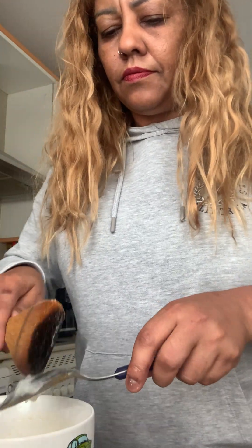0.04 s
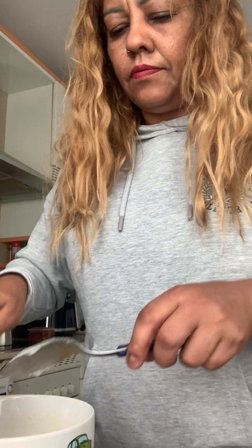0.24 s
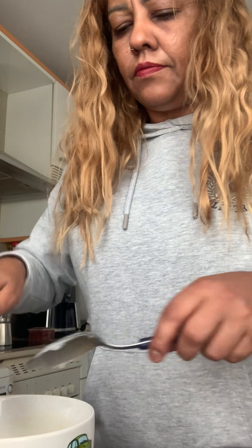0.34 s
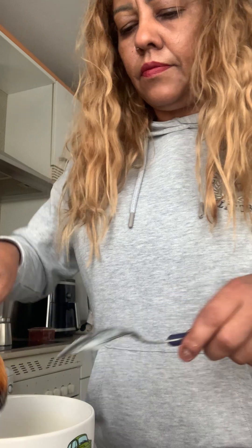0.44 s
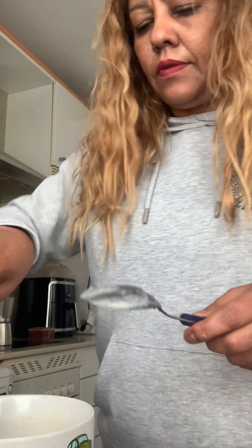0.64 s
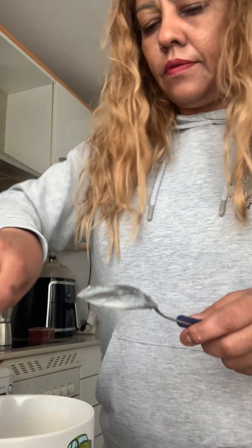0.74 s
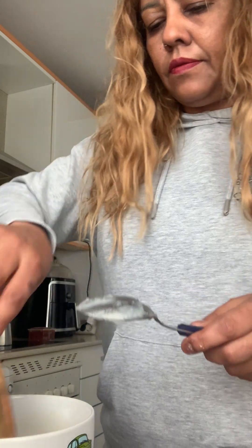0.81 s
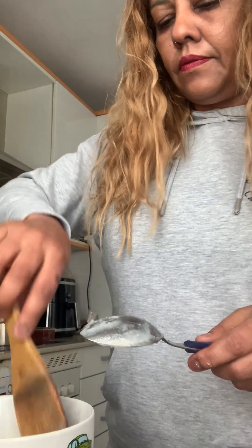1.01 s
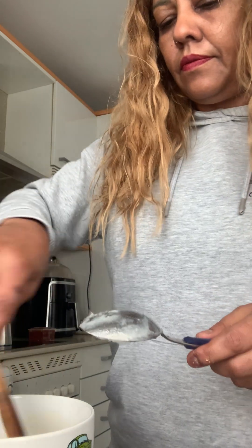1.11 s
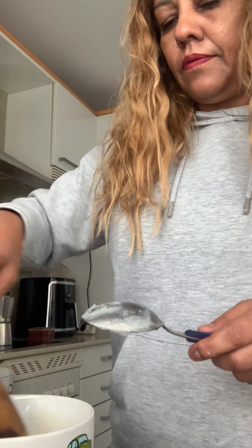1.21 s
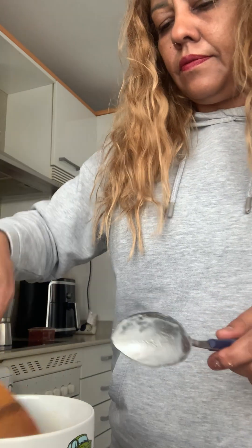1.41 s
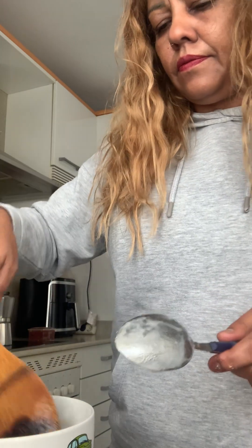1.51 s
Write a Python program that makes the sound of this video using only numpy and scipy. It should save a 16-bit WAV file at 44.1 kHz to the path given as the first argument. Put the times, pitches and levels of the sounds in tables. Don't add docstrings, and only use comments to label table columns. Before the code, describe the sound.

Close stereo phone pickup in a tiled kitchen: over a faint hum and a fading earlier clink, wood and metal hit a ceramic bowl hard, then lightly tick, scrape, thump and rattle.

```python
import sys
import numpy as np
from scipy import signal
from scipy.fft import rfft, irfft
from scipy.io import wavfile
from scipy.ndimage import uniform_filter1d, map_coordinates

SR = 44100
rng = np.random.default_rng(int(sys.argv[2]) if len(sys.argv) > 2 else 0)


def log_audio(samples):
    frames = np.atleast_2d(samples).T
    limited = np.clip(frames, -1, 1)
    pcm = np.round(limited * 32767).astype(np.int16)
    wavfile.write(sys.argv[1], SR, pcm)


def how_loud(loudness_db):
    steps = np.asarray(loudness_db, float) / 20
    return 10 ** steps


N = 68355

# frequency in Hz, density in dB per Hz.
HUM_SPECTRUM = [(25, -15.5), (50, 14.5), (100, -6), (200, -4), (500, -6.5), (1000, -17), (2200, -28.5),
                (5500, -38.5)]
# time in seconds, change of level in dB.
HUM_SWELL = [
    (0, 1.5),
    (.18, -16),
    (.45, 8),
    (.68, 3),
    (.95, 2.5),
    (1.55, 10.5),
]
# frequency in Hz, density in dB per Hz.
HISS_SPECTRUM = [(4000, -11.5), (6000, -6), (7600, -7), (8500, -2), (10300, -6), (11500, -13.5),
                 (12500, -41)]
# frequency in Hz, density in dB per Hz.
EARLIER_SPECTRUM = [(250, -36), (480, -5.5), (900, -12.5), (1690, -0.5), (2000, -6.5), (2750, 0.5),
                    (4000, -9.5), (6500, -24), (7200, -45.5)]
# band centre in Hz, t60 in seconds, level in dB, likeness of channels 0-1.
ROOM_BANDS = [(106, 0.41, -2.5, 1), (324, 0.39, -4.5, .5), (1000, 0.43, 0, 0.1), (2500, 0.49, -7, 0.1),
              (5770, 0.37, 1, 0.5), (10230, 0.25, -4, 1)]
# delay in ms, level in dB.
REFLECTIONS = [(.9, -33.5), (2.3, -24.5), (4.1, -18.5), (7.3, -21)]
# time in seconds, level in dB.
SCRAPE_LEVEL = [(0, -107), (0.171, -82), (0.2, -51), (0.238, -28), (0.401, -57.5), (0.551, -78), (.72, -71),
                (0.758, -45.5), (.9, -69.5), (0.998, -94), (1.038, -41), (1.198, -93), (1.25, -61),
                (1.287, -61.5), (1.36, -58), (1.418, -56.5), (1.55, -113)]
# frequency in Hz, level in dB, t60 in seconds.
COUNTER_MODES = [(97, -7, 0.2), (153.8, -11, 0.17), (184.3, -16.5, 0.28), (214.2, -7, 0.1),
                 (252, -8, 0.091), (290, -4.5, 0.095), (337, -13, 0.11), (418.5, -10.5, 0.15)]
# frequency in Hz, level in dB, t60 in seconds.
BOWL_MODES = [(356.4, -14.5, 0.18), (405, -18, .1), (562, -7.5, 0.052), (651.3, -13, 0.15),
              (742, -6, 0.045), (795, -11, 0.04), (940, -9.5, 0.032), (989.4, -20, 0.16),
              (1152, -8.5, 0.051), (1300, -8, 0.03), (1457.4, -11, 0.08), (1690, -12.5, 0.03),
              (1812, -8.5, 0.016), (2790, -7.5, 0.01)]
# start in seconds, bowl level in dB, counter level in dB, contact time in ms.
KNOCKS = [(0.2201, -13.5, -28.5, 0.43), (.2255, -15, -24, 0.14), (0.2308, -14, -24.5, 0.57),
          (.238, -20.5, -34, 0.8), (0.253, -20.5, -47.5, 0.23), (.523, -57.5, -50.5, 0.44),
          (0.747, -39, -36, 1.82), (0.77, -61, -48.5, 0.93), (0.794, -54, -42, 1.7), (.827, -37, -53, .9),
          (1.025, -40.5, -44.5, 0.57), (1.029, -36.5, -73, 0.74), (1.045, -29.5, -31.5, 1.05),
          (1.050, -41, -33, 2.06), (1.074, -37, -33.5, 2.37), (1.1, -32, -39.5, 2.1),
          (1.263, -29.5, -72, 0.28), (1.277, -32, -36.5, 1.12), (1.318, -31, -49.5, 0.71),
          (1.328, -32.5, -49.5, 0.81), (1.379, -33, -38.5, 0.75), (1.406, -43.5, -46, 0.44),
          (1.4171, -35, -47, 0.47), (1.426, -41, -49, 0.69), (1.447, -38.5, -56, 0.79),
          (1.457, -29.5, -60, 1.84), (1.476, -40, -48, 0.96), (1.533, -48, -46.5, 0.54)]
# frequency in Hz, level in dB, t60 in seconds.
NOTE_MODES = [(1278.1, 1.5, 0.12), (1287.7, -1.5, .125)]
# start in seconds, level in dB.
RIM_KNOCKS = [
    (0.221, -10),
    (1.264, -32.5),
]
# start in seconds, level in dB, pitch in Hz, t60 in ms.
THUMPS = [
    (.7535, -27, 151, 27),
    (.770, -31.5, 140, 24),
    (.794, -28.5, 200, 19),
    (1.0465, -22.5, 300, 37),
    (1.0555, -11.5, 182, 20),
    (1.0735, -23.5, 170, 23),
]
# start in seconds, level in
# dB, pitch in Hz, t60 in ms.
CLACKS = [(.193, -41, 1520, 24), (0.1967, -16.5, 1540, 22), (.198, -55, 14600, 9.2),
          (0.1964, -26.5, 1000, 40), (.1985, -38, 4600, 26), (.2219, -25.5, 1150, 7.2),
          (.2255, -14, 1200, 8.7), (0.2282, -22.5, 3150, 20), (0.2271, -21.5, 2550, 31),
          (.2305, -14, 1263, 14), (.2375, -12, 1300, 14), (0.25, -28, 1830, 60), (.521, -58, 2700, 19),
          (0.39, -60.5, 3500, 12), (0.5226, -40, 614, 22), (0.79, -45, 480.4, 20),
          (.741, -31.5, 1625, 25.6), (.7415, -35, 804, 26), (.828, -43, 920, 31), (.837, -38.5, 1000, 10.6),
          (.843, -43, 514, 73), (1.027, -32, 850, 20.3), (1.042, -66, 15300, 11), (1.2615, -54, 4260, 10),
          (1.262, -40.5, 3190, 21.4), (1.2632, -47, 2500, 25), (1.263, -33, 1300, 44),
          (1.265, -27, 868, 35.5), (1.319, -34, 1118, 21), (1.372, -40, 3070, 10.3),
          (1.3722, -27.5, 1690, 27), (1.373, -47, 4430, 9.7), (1.375, -30, 903, 23),
          (1.378, -53.5, 5340, 14), (1.382, -57, 5900, 13), (1.39, -60, 5000, 11), (1.418, -29, 1110, 15),
          (1.447, -27, 880, 15.3), (1.474, -40, 1000, 29)]
# frequency in Hz, level in dB, t60 in seconds.
SPOON_LOW = [(2539, 5.5, 0.021), (2590, -9, 0.024), (2415, -12, 0.022)]
SPOON_MID = [(3445, -1.5, 0.02), (3670, 0, 0.014), (3830, 7, 0.013), (4120, 1, 0.012), (4670, -19.5, 0.038)]
SPOON_TOP = [(5180, 8, 0.0063), (6013, 7.5, 0.0088), (6576, 6, 0.0065), (7880, -8, 0.0065),
             (8690, -1, 0.0068), (9600, -6.5, 0.0097), (10600, -16, .006), (15200, -26, .008)]
# frequency in Hz, density in dB per Hz.
CRACK_SPECTRUM = [(800, -2), (3000, -2), (7000, -20.5), (11000, -17), (12500, -24.5), (14500, -31.5),
                  (16000, -44.5)]
# start in seconds, then low, middle, treble and crack levels in dB.
TICKS = [
    (0.1987, -63, -25, -29.5, -41),
    (.741, -39, -33, -45.5, -48),
    (1.041, -34.5, -36.5, -49, -42.5),
    (1.263, -57, -57.5, -70, -58.5),
    (1.373, -56, -56.5, -71, -61.5),
    (1.548, -60, -86, -68.5, -62),
]

HUM_DB, HUM_ALIKE = -63, 0.7
HISS_DB, HISS_ALIKE = -83, 0.82
EARLIER_DB, EARLIER_T60_S = -43.5, 0.41
ROOM_DELAY_MS, ROOM_TOP_HZ = 1.3, 11500
EARLIER_ALIKE = 0.38
RIM_ROOM_DB, THUMP_ROOM_DB = -13, -13
SCRAPE_PER_S, GRAIN_DB = 900, 2.5
SCATTER_DB, DETUNE = 1.2, 0.003
RISE_MS, CRACK_MS = 0.26, 4.5
SLIDE_DB, SLIDE_MS = -30.5, 6
LEFT_LAG_SAMPLES = 5.01
LEFT_BASS_DB, LEFT_BASS_HZ = 4, 143.5
MIC_LOW_HZ = 80


def shaped(points, size):
    hz, db = np.array(points).T
    f = np.maximum(np.arange(size // 2 + 1) * SR / size, 1)
    gain = how_loud(np.interp(np.log(f), np.log(hz), db, left=-90, right=-90))
    x = irfft(rfft(rng.standard_normal(size)) * gain, size)
    return x / x.std()


def pair(make, alike):
    c = np.clip(alike, 0, 1)
    mid = make() * np.sqrt((1 + c) / 2)
    side = make() * np.sqrt((1 - c) / 2)
    return np.array([mid + side, mid - side])


def add(out, s, x):
    i = int(s * SR)
    out[i:i + len(x)] += x[:len(out) - i]


def decay(t, t60):
    return 1000. ** (-t / t60)


def ring(modes, db, size=20000):
    hz, mode_db, t60 = np.array(modes).T[:, :, None]
    chance = rng.standard_normal((2, len(modes), 1))
    t = np.arange(size) / SR
    waves = np.sin(2 * np.pi * hz * (1 + DETUNE * chance[0]) * t) * decay(t, t60)
    sign = (-1.) ** np.arange(len(modes))[:, None]
    level = how_loud(db + mode_db + SCATTER_DB * chance[1])
    return (sign * level * waves).sum(axis=0)


def background():
    swell_s, swell_db = np.array(HUM_SWELL).T
    hum_level = how_loud(HUM_DB + np.interp(np.arange(N) / SR, swell_s, swell_db))
    hum = hum_level * pair(lambda: shaped(HUM_SPECTRUM, N), HUM_ALIKE)
    hiss = how_loud(HISS_DB) * pair(lambda: shaped(HISS_SPECTRUM, N), HISS_ALIKE)
    return hum + hiss


def earlier_clink():
    noise = pair(lambda: shaped(EARLIER_SPECTRUM, N), EARLIER_ALIKE)
    return noise * how_loud(EARLIER_DB) * decay(np.arange(N) / SR, EARLIER_T60_S)


def room(x, size=32768):
    t, tail = np.arange(size) / SR, 0
    for hz, t60, db, alike in ROOM_BANDS:
        points = [(hz / 3, -30), (hz / 1.266, 0), (hz * 2.0, 0), (hz * 3, -30)]
        noise = pair(lambda: shaped(points, size), alike)
        shape = decay(t, abs(t60)) * (1 - np.exp(-t * 1000 / ROOM_DELAY_MS))
        shape = shape / np.sqrt(np.sum(shape ** 2))
        tail = tail + noise * shape * how_loud(db) * np.sqrt(hz / SR)
    tail = signal.sosfilt(signal.butter(6, ROOM_TOP_HZ, fs=SR, output="sos"), tail)
    return signal.fftconvolve(x[None], tail, axes=1)[:, :N]


def early(x):
    low = signal.sosfilt(signal.butter(1, 3000, fs=SR, output="sos"), x)
    side = np.zeros(N)
    for k, (ms, db) in enumerate(REFLECTIONS):
        add(side, ms / 1000, (-1) ** k * how_loud(db) * low)
    return np.array([side, -side])


def scrape():
    s, db = np.array(SCRAPE_LEVEL).T
    happens = rng.random(N) < SCRAPE_PER_S / SR
    slips = happens * how_loud(GRAIN_DB * rng.exponential(size=N)) * rng.standard_normal(N)
    k = np.arange(3000)
    body = ring(BOWL_MODES, 0, size=3000) * np.exp(-k / 1600.0)
    body += ring(COUNTER_MODES, -5.5, size=3000) * np.exp(-k / 920.0)
    body += ring(SPOON_MID + SPOON_LOW, -15, size=3000)
    x = signal.fftconvolve(uniform_filter1d(slips, size=5), body)[:N]
    return x / x.std() * how_loud(np.interp(np.arange(N) / SR, s, db))


def bowl():
    out, push_ms = np.zeros(N), np.arange(300) / SR * 1000
    for s, bowl_db, counter_db, contact_ms in KNOCKS:
        push = np.sin(np.pi * np.clip(push_ms / max(contact_ms, .1), 0, 1)) ** 2
        body = ring(BOWL_MODES, bowl_db) + ring(COUNTER_MODES, counter_db)
        add(out, s, signal.fftconvolve(body, push / push.sum()))
    return out


def rim():
    out, t = np.zeros(N), np.arange(20000) / SR
    for s, db in RIM_KNOCKS:
        for k, (hz, mode_db, t60) in enumerate(NOTE_MODES):
            add(out, s, (-1) ** k * how_loud(db + mode_db) * np.sin(2 * np.pi * hz * t) * decay(t, t60))
    return out


def short_hits(hits):
    out, t = np.zeros(N), np.arange(4000) / SR
    for s, db, hz, t60_ms in hits:
        build = 1 - np.exp(-t * hz / 1.2)
        add(out, s, how_loud(db) * np.sin(2 * np.pi * hz * t) * decay(t * 1000, t60_ms) * build)
    return out


def spoon():
    out, ms = np.zeros(N), np.arange(2048) / SR * 1000
    for s, low_db, mid_db, top_db, crack_db in TICKS:
        stem = ring(SPOON_LOW, low_db) + ring(SPOON_MID, mid_db)
        tick = stem + ring(SPOON_TOP, top_db)
        tick[:2048] += shaped(CRACK_SPECTRUM, 2048) * how_loud(crack_db) * np.exp(-ms / CRACK_MS)
        rise = 1 - np.exp(-np.arange(len(tick)) / (SR * RISE_MS / 1000))
        add(out, s, tick * rise)
        slide = rng.standard_normal(2048) * np.exp(-ms[::-1] / SLIDE_MS) * how_loud(SLIDE_DB)
        add(out, s - 2048 / SR, signal.fftconvolve(slide, np.diff(stem[:2048])))
    return out


def scene():
    floor = background() + earlier_clink()
    work = scrape() + bowl() + short_hits(CLACKS) + spoon()
    note, thump = rim(), short_hits(THUMPS)
    wet = room(work + how_loud(RIM_ROOM_DB) * note + how_loud(THUMP_ROOM_DB) * thump)
    direct = work + note + thump
    return direct + early(direct) + wet + floor


def band_limit(x):
    return signal.sosfilt(signal.butter(12, 16160, fs=SR, output="sos"), x)


def record(dry):
    left = map_coordinates(dry[0], [np.arange(N) - LEFT_LAG_SAMPLES], order=5, mode="mirror")
    bass = signal.sosfilt(signal.butter(1, LEFT_BASS_HZ, fs=SR, output="sos"), left)
    left = left + (how_loud(LEFT_BASS_DB) - 1) * bass
    high_pass = signal.butter(4, MIC_LOW_HZ, "high", fs=SR, output="sos")
    mix = signal.sosfilt(high_pass, np.array([left, dry[1]]))
    return band_limit(mix)


dry = scene()
out = record(dry)
log_audio(out)
```